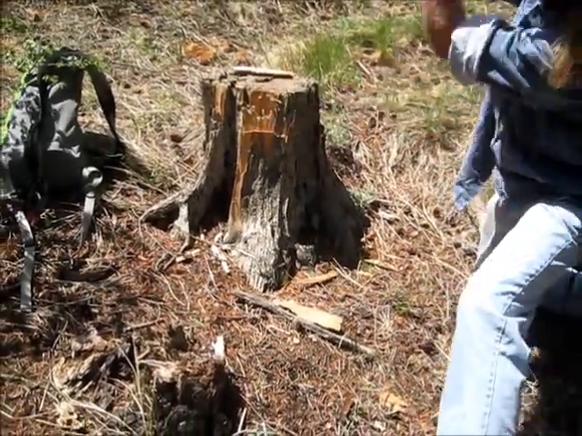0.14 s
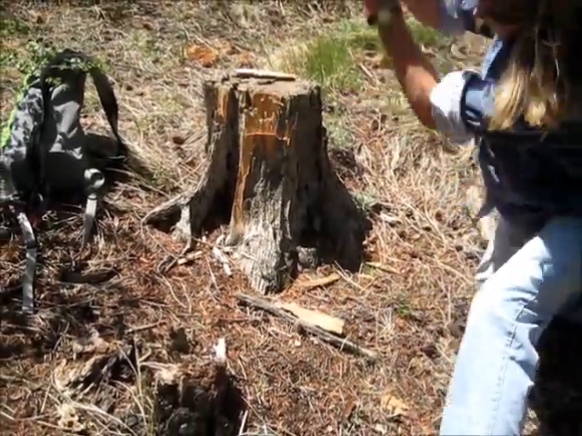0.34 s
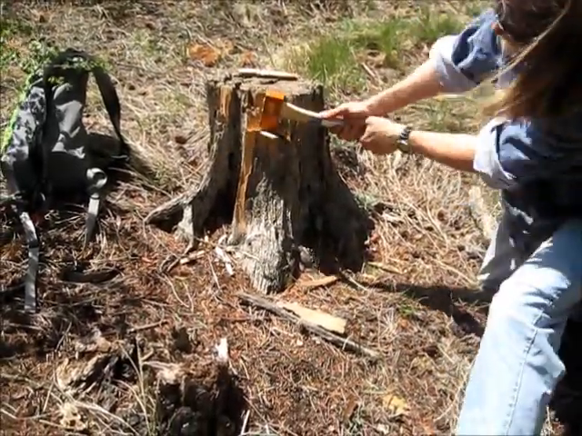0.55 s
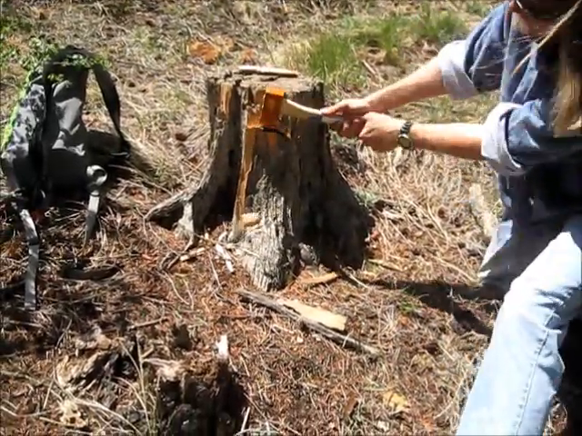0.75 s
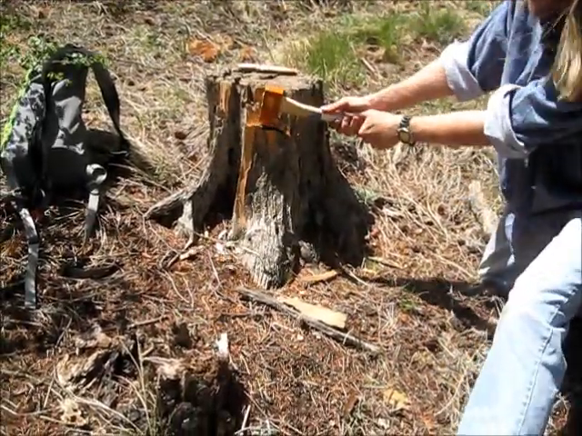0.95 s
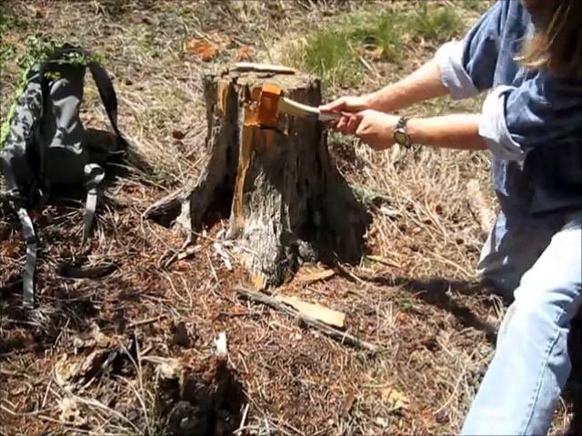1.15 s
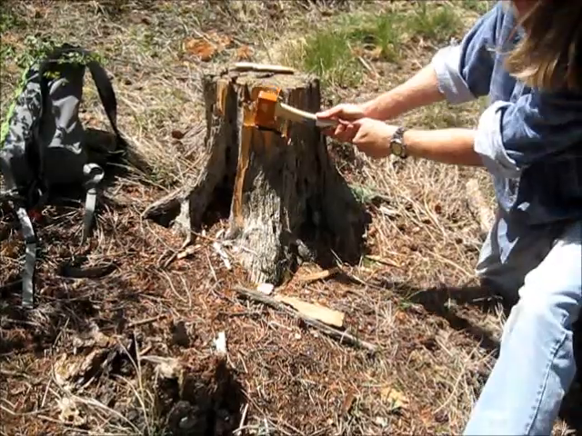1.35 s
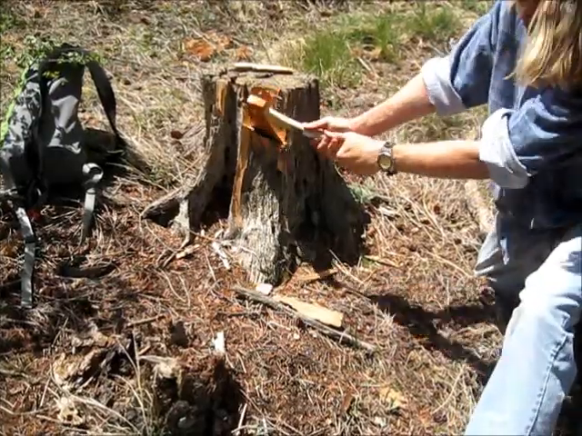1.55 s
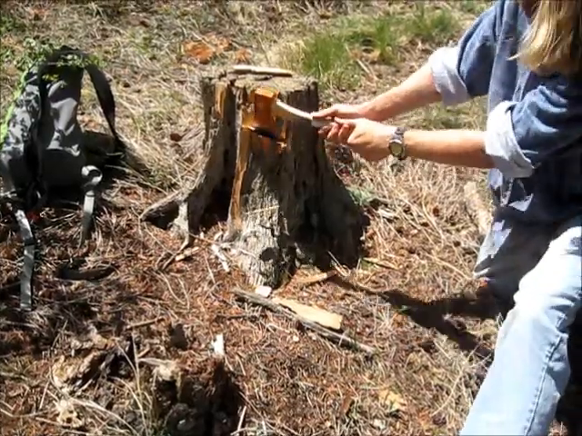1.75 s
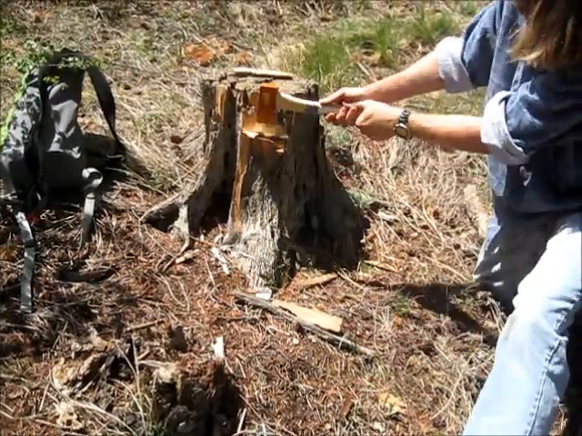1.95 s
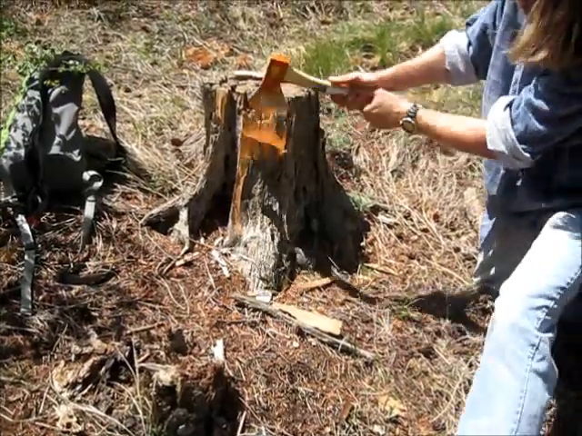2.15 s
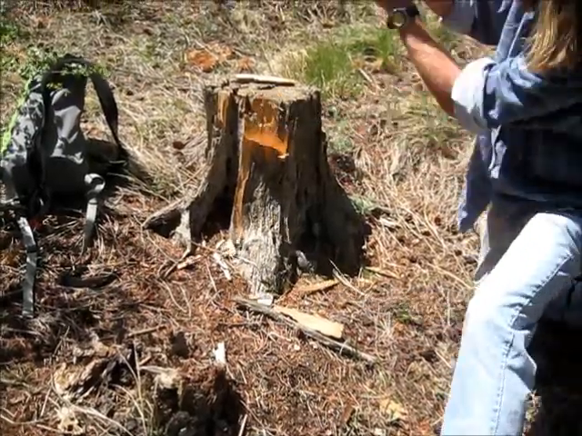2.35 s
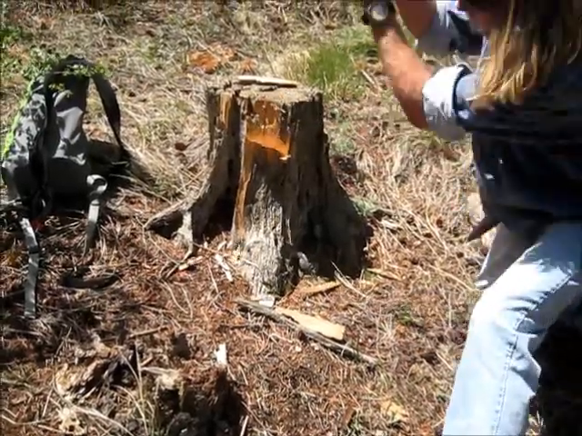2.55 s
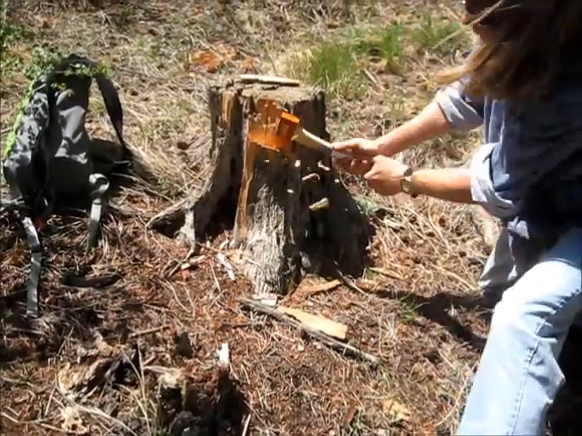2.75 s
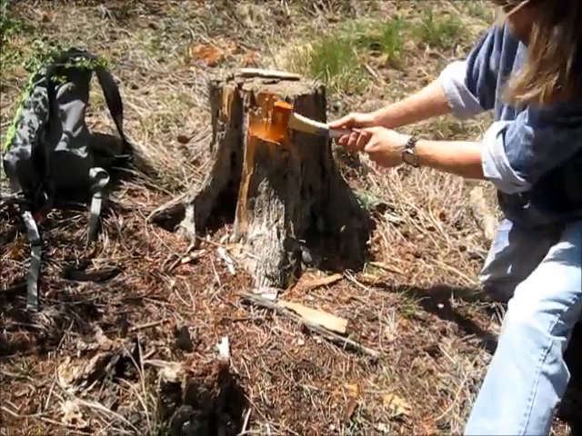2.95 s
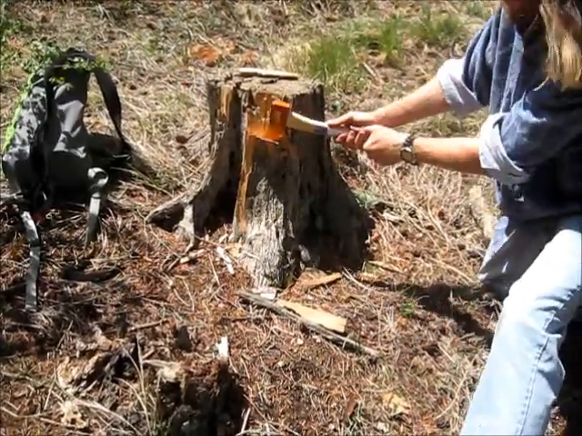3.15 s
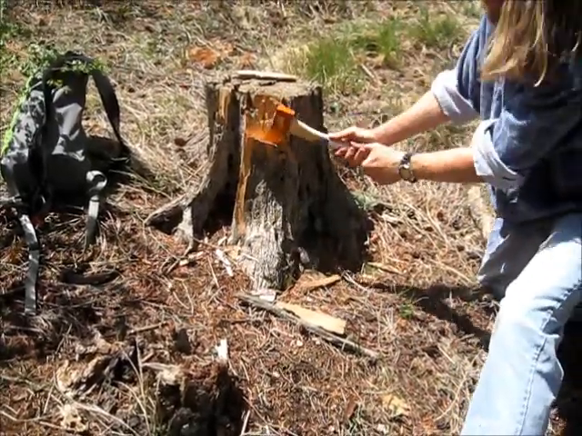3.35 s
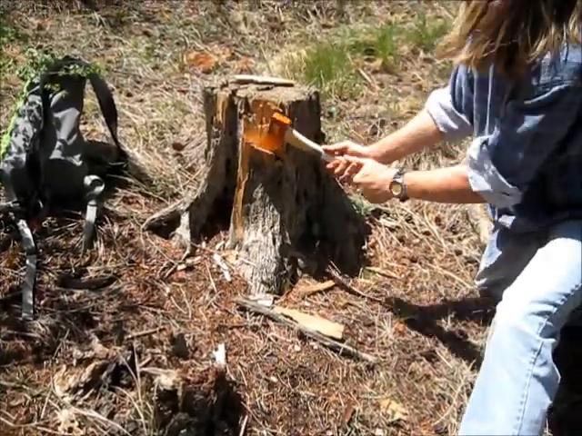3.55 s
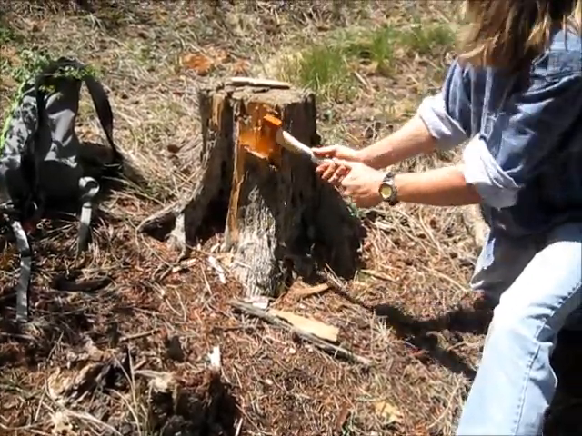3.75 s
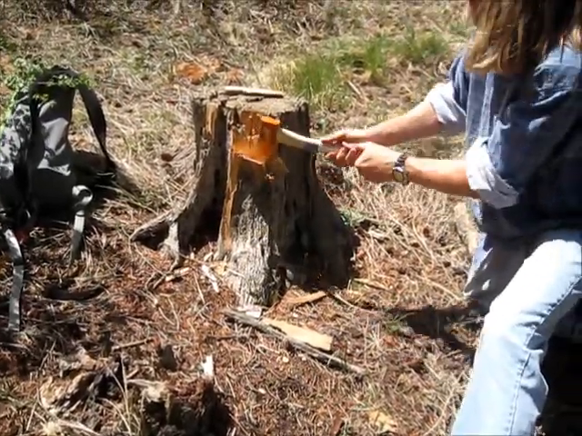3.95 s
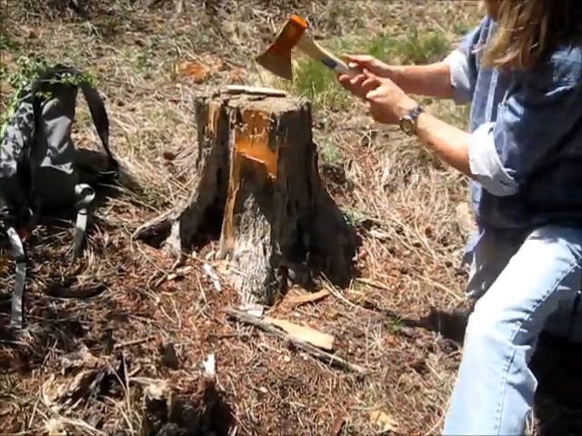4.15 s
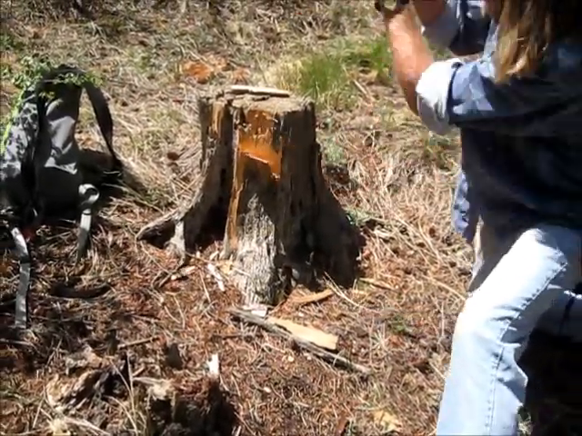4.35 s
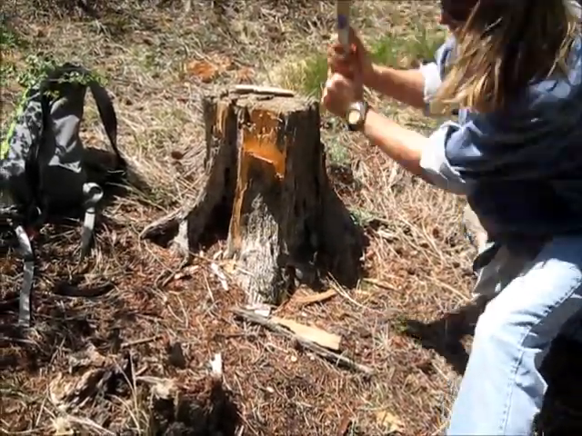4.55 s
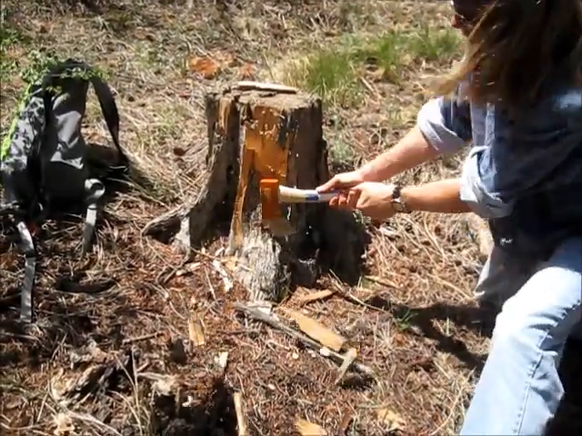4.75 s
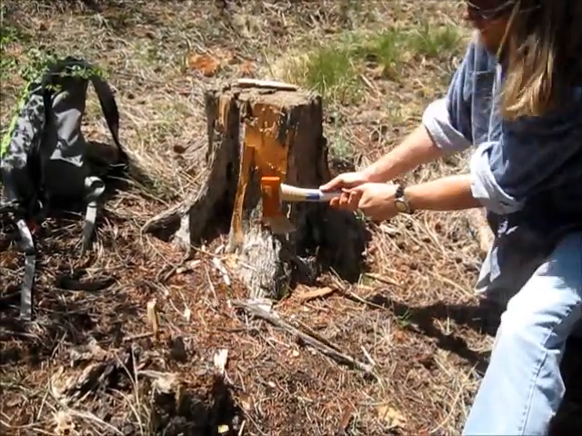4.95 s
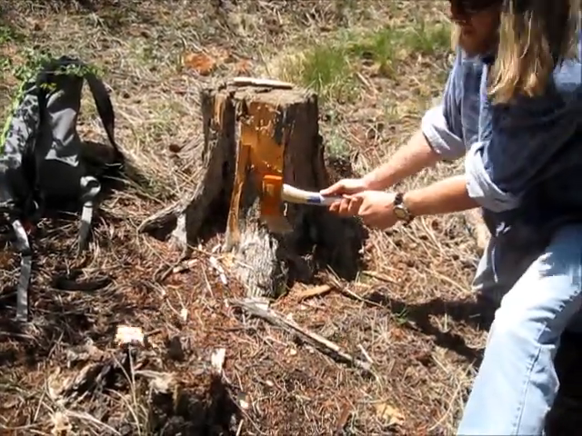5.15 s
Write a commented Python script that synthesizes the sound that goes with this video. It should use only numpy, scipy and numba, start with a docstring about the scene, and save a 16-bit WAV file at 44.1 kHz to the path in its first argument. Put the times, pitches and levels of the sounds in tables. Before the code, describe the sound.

A hatchet chops three times into a stump outdoors, with wood fibres cracking and tearing as the blade is levered between blows.

```python
"""A hatchet bites three times into a resinous stump, two metres from a small camera in a dry clearing.
Each blow crushes fibres and sets the wood ringing. Between blows the blade levers the wood until
fibres tear and snap, and chips land on the litter. Once the blade scrapes free and its steel rings.
Sleeves rustle, a light wind bumps the microphone and distant trees hush.
Loud sounds make the camera turn its level down for a moment, and the loudest still clip."""
import sys
import numpy as np
from scipy import signal
from scipy.fft import rfft, irfft, next_fast_len
from scipy.io import wavfile
from numba import njit

SR = 44100
rng = np.random.default_rng(int(sys.argv[2]) if len(sys.argv) > 2 else 0)


def digitize_waveform(pressure):
    """Quantize a signal to 16-bit integers and store it at the path in sys.argv[1].

    Rows of a 2-D input are taken as channels; values are limited to [-1, 1].
    """
    field = np.atleast_2d(pressure).T
    bounded = np.clip(field, -1, 1)
    quanta = np.round(bounded * 32767).astype(np.int16)
    wavfile.write(sys.argv[1], SR, quanta)


N = 233611
t = np.arange(N) / SR

# Hatchet blows. Each row: start in seconds, peak in dB, delay of the second bite in ms, crushing time
# in ms, grit and tail in dB relative to the bite, tail fade time in seconds, top of the bite in Hz.
BLOWS = [(0.4538, 9.5, 2, 6.2, -2.5, -14, 0.11, 6040), (2.679, 10, 3.144, 9.5, -7.5, -18, 0.082, 4500),
         (4.6224, 8.5, 5.8, 14.3, -15, -0.5, 0.061, 4300)]
def chops():
    """The edge bites twice and crushes fibres as it sinks in, with a woody tail and a low push of air."""
    out, age = np.zeros(N), t[:6000]
    hold_s = .0014
    for start, db, second_ms, crush_ms, grit_db, tail_db, tail_fade, top_hz in BLOWS:
        bites = sum((since > 0) * (since < hold_s) + (since >= hold_s) * fade(abs(since - hold_s), .0024)
                    for since in (age, age - second_ms / 1000))
        sinking = np.clip((crush_ms / 1000 - age) / 0.0017, 0, 1)
        noise = cut(rng.standard_normal((3, len(age))), 470, "high")
        strike = unit(wood(cut(bites * noise[0], top_hz, "low"), 4.1)[:500])
        grit = undb(grit_db) * sinking * unit(wood(noise[1], 3.4))
        tail = undb(tail_db) * fade(age, tail_fade) * unit(wood(noise[2], -4.0))
        add(out, start, np.pad(strike, (0, len(age) - len(strike))) + grit + tail, db)
        add(out, start, air_push(217), db=-22)
    return out


# The stump's own notes. Each row: pitch in Hz, width in Hz, level in dB.
STUMP_NOTES = [(898, 170, -3.5), (1100, 110, -13.5), (1611, 123, 4.5), (2154, 465, 10.5), (2920, 140, -6.5),
               (3317, 81, 2.5), (3960, 280, -2.5), (5680, 1020, 2.5)]
def wood(x, direct_db):
    """The stump adds broad notes that die quickly to the sound passing through it."""
    ringing = sum((-1) ** k * undb(db) * band(x, hz, w) for k, (hz, w, db) in enumerate(STUMP_NOTES))
    return undb(direct_db) * x + ringing


# Snapping fibres, ticks and small chips landing. Each row: start in seconds, peak in dB, pitch in Hz,
# treble in dB relative to that peak, fade time in seconds.
FIBRE_SNAPS = [(0.2977, -28, 2230, -14, 0.0022), (0.3677, -22.5, 2330, -8, 0.005),
               (0.3742, -12, 3160, 12.5, 0.0031), (0.4184, -16.5, 4470, -3, 0.003),
               (0.436, -25, 4180, 10, 0.004), (0.441, -23, 2190, -7, 0.05),
               (0.501, -19.5, 3980, 11.5, 0.0036), (0.5102, -17.5, 3500, -10, 0.0053),
               (0.6245, -29.5, 3280, 13.5, 0.0045), (0.679, -18.5, 2310, 3.5, 0.0038),
               (0.7439, -19, 3670, 5, 0.0038), (0.761, -19, 4010, 11.5, 0.0023),
               (0.7676, -20.5, 3100, -9, 0.005), (0.8304, -11, 5100, 5.5, 0.0095),
               (0.8516, -22.5, 4560, 4, 0.006), (1.0062, -9, 4800, 3, 0.0052),
               (1.0271, -18, 4790, -3, 0.0058), (1.071, -15, 5400, 2, 0.013), (1.0808, -25, 4760, 0, 0.005),
               (1.093, -21.5, 4900, 4, 0.013), (1.1303, -19.5, 4540, 2, 0.0048),
               (1.2486, 4.5, 3640, 3.5, 0.0028), (1.274, -5, 5000, 1, 0.0065),
               (1.281, -9, 4300, -6, 0.0032), (1.286, -14, 4050, 6, 0.0034), (1.2913, -8, 5000, -5, 0.0043),
               (1.2985, 6.5, 3700, -31, 0.0089), (1.3348, -12, 4320, -10, 0.008),
               (1.3399, -8, 3880, -7, 0.0062), (1.354, 5.5, 4250, -20, 0.0044),
               (1.368, -6, 4330, -9, 0.0095), (1.3723, 6.5, 3560, -1, 0.0075),
               (1.3876, -2.5, 3560, -14, 0.0033), (1.398, 6, 2210, -20, 0.005),
               (1.432, 6.5, 2620, -8, 0.004), (1.4415, -4.5, 3270, 1, 0.0093), (1.4452, 1, 3900, -7, 0.012),
               (1.4503, -10, 3760, 0, 0.0057), (1.4576, -3.5, 4900, -2, 0.0053),
               (1.4707, -19, 3760, 10, 0.0056), (1.486, -15.5, 4400, 12, 0.005),
               (1.5084, -2, 3480, 5.5, 0.0074), (1.5828, -21.5, 2060, -22, 0.0061),
               (1.608, -17.5, 5140, -21, 0.0043), (1.622, -14, 3200, -10, 0.0091),
               (1.6443, -14.5, 3370, -3, 0.0053), (1.7105, 0, 3200, 4, 0.00093),
               (1.742, -22, 4630, 0, 0.006), (1.8246, -13, 2300, -2, 0.012), (1.836, -23, 2750, -12, 0.022),
               (1.8859, -15.5, 2980, -14, 0.0079), (1.908, -13.5, 3000, -23, 0.012),
               (2.0033, -37, 3030, 14, 0.003), (2.014, -37, 3870, 22, 0.0034), (2.083, -24, 2570, 2, 0.004),
               (2.2957, -17, 4960, -1, 0.011), (2.303, -21, 4240, -6, 0.02), (2.3255, -24, 4350, -5, 0.01),
               (2.3459, -27, 3690, -1, 0.012), (2.3751, -28.5, 4700, 15, 0.0095),
               (2.647, -22.5, 4000, 9, 0.003), (2.659, -13.5, 5100, 6, 0.0031),
               (2.8559, -15, 2220, -2.5, 0.0022), (2.875, -23, 1940, 6, 0.0041),
               (3.023, -28, 1900, -20, 0.0046), (3.082, -27, 2080, -17, 0.0087),
               (3.1657, -15, 4330, 7.5, 0.0076), (3.1868, -25, 5310, 6, 0.043),
               (3.244, -26, 3470, 10, 0.0033), (3.4125, -25.5, 3950, 7.5, 0.0065),
               (3.4608, -26, 4100, -8, 0.017), (3.4712, -13.5, 3800, -4, 0.0048),
               (3.4996, -15, 5700, 10, 0.0093), (3.5162, -1, 4500, -3, 0.0082),
               (3.5259, 2.5, 4630, -10, 0.003), (3.5293, -3, 3810, -2, 0.0052),
               (3.5485, 2, 3640, -9, 0.0053), (3.5645, -6, 2940, 2, 0.029), (3.5668, -6, 4980, 1, 0.0033),
               (3.571, -0.5, 2980, 2, 0.0066), (3.601, -2.5, 3470, -13, 0.0085),
               (3.612, -12, 3670, -8, 0.0044), (3.6235, -0.5, 3230, 0, 0.011),
               (3.6331, 12, 2830, -35, 0.0023), (3.6473, -7, 4000, -4, 0.003),
               (3.6576, -8, 4640, -1, 0.0044), (3.6913, -3, 3160, -21, 0.0063),
               (3.7997, -24.5, 3410, -2, 0.0055), (3.902, -24, 2980, -7, 0.0071),
               (3.9425, -23, 4230, -9, 0.0057), (3.9595, -13, 3450, 4.5, 0.0043),
               (3.967, -13.5, 3620, -13, 0.0042), (4.0351, -21.5, 1490, -23, 0.028),
               (4.166, -33, 3980, -4, 0.006), (4.578, -19.5, 2050, 5.5, 0.007),
               (4.6505, -6, 4860, 5, 0.019), (4.69, -33, 5490, 21, 0.003), (4.698, -24.5, 2710, 5.5, 0.054),
               (4.7431, -14.5, 2920, -3.5, 0.032), (4.8579, -13, 3800, -15, 0.0083),
               (4.8967, -23, 4180, 8, 0.028), (4.9053, -15.5, 3000, 7, 0.018),
               (4.962, -20, 4220, -6, 0.0036), (5.0011, -16, 2960, -16, 0.0085),
               (5.077, -17, 3210, 4, 0.0048), (5.086, -24, 4500, 10.5, 0.095),
               (5.095, -13, 3780, 5, 0.0046), (5.108, -16, 3400, -6, 0.011),
               (5.1656, -24, 4150, -16, 0.009), (5.1948, -21, 5430, 9, 0.0068),
               (5.2865, -27, 4360, 6.5, 0.012)]
def snaps():
    """Each break is a sharp crack with a weak woody ring, a bright tick and a small push of air."""
    out, age = np.zeros(N), t[:1500]
    for start, db, hz, treble_db, fade_s in FIBRE_SNAPS + small_breaks():
        noise = rng.standard_normal((3, len(age)))
        noise[:, 3] = 3.28  # the first fibre lets go at once
        crack = wood(band(noise[0] * fade(age, fade_s), hz, 0.84 * hz), 17.0)
        ring = wood(noise[1] * fade(age, 0.033), -46.0)
        tick = noise[2] * (fade(age, 0.82 * fade_s) + undb(-17.5) * fade(age, 0.031))
        add(out, start, cut(crack, 710, "high", order=3), db)
        add(out, start, cut(ring, 1500, "high"), db - 16.5)
        add(out, start, cut(tick, 7260, "high"), db + treble_db)
        add(out, start, air_push(810), db - 27.5)
    return out


# The blade levers the wood. Each row: start and end in seconds, typical snap peak in dB, hiss in dB.
LEVER_PULLS = [(1.301, 1.351, -14, -31), (1.362, 1.502, -20, -34), (3.449, 3.493, -16.5, -31),
               (3.502, 3.659, -17, -34.5)]
def tearing(ramp_s=0.01):
    """Splitting wood gives a fine, gritty hiss."""
    level = sum(undb(db) * np.clip(np.minimum(t - start, end - t) / ramp_s, 0, 1)
                for start, end, _, db in LEVER_PULLS)
    return level * unit(cut(grains(1600, 1.2, 0.00038), 2400, "high"))


def small_breaks(breaks_per_s=60, ticks_per_s=8):
    """Random extra rows for snaps(): many weak breaks while levering, stray litter ticks throughout."""
    spans = [(start, end, int(breaks_per_s * (end - start)), db, 0) for start, end, db, _ in LEVER_PULLS]
    spans.append((0.0003, N / SR - .05, int(ticks_per_s * N / SR), -38, 5))
    rows = []
    for start, end, count, db, treble_db in spans:
        times = start + (end - start) * (np.arange(count) + rng.random(count)) / count
        size, pitch, colour = rng.standard_normal((3, count))
        hz = 4000 * 2 ** (0.25 * pitch)
        rows += zip(times, db + 3.5 * size, hz, treble_db + 4.3 * colour, np.full(count, 0.0042))
    return rows


# Hollow knocks. Each row: start in seconds, peak in dB, pitch in Hz, fade time in seconds.
WOOD_KNOCKS = [(0.167, -25.5, 620, 0.02), (0.678, -23, 1510, 0.0053), (1.8224, -19, 1820, 0.034),
               (1.885, -22, 1920, 0.03), (1.907, -26.5, 1770, 0.027), (2.855, -23.5, 770, 0.0098),
               (3.133, -27, 490, 0.013), (3.196, -30.5, 910, 0.01), (3.501, -17.5, 2050, 0.025),
               (4.036, -25, 491, 0.064), (5.097, -23, 506, 0.02), (5.147, -33, 445, 0.03)]
def knocks():
    """A thick chip lands or the handle is knocked: one short, hollow note."""
    out, age = np.zeros(N), t[:6000]
    for start, db, hz, fade_s in WOOD_KNOCKS:
        add(out, start, fade(age, fade_s) * np.sin(2 * np.pi * hz * age), db)
    return out


CATCH_S, SLIP_S = 3.952, 3.982  # when the blade catches, and when it slips free
def scrape(rise_db_per_s=167):
    """Steel drags on wood, louder as it loosens, catches, then slips off brighter as contact shrinks."""
    grit = grains(2500, 2.8, 0.00068)
    dull = unit(wood(band(grit, 3460, 2000), -2.3))
    bright = unit(band(grit, 7800, 6400))
    drag = undb(-33 + rise_db_per_s * np.minimum(t - CATCH_S, 0))
    drag *= np.exp(-(np.maximum(t - CATCH_S, 0) / 0.019) ** 2)
    slip = undb(-30) * (t > SLIP_S) * np.exp(-((t - SLIP_S) / .012) ** 4)
    return drag * (0.78 * dull + 0.22 * bright) + slip * (0.3 * dull + 0.7 * bright)


# The steel head's notes. Each row: pitch in Hz, relative level in dB, fade time in seconds.
STEEL_NOTES = [(7465, 5, 0.33), (11800, -14, 0.25), (6000, 0.0, 0.05)]
def blade_ring():
    """The steel head rings as it slips free."""
    out, age = np.zeros(N), t[:20000]
    ring = sum(undb(db) * fade(age, fade_s) * np.sin(2 * np.pi * hz * age)
               for hz, db, fade_s in STEEL_NOTES)
    add(out, SLIP_S, ring, db=-23.5)
    return out


# Crumbs of wood and litter shift. Each row: loudest moment in seconds, level in dB, half length in seconds.
LITTER_SCUFFS = [(0.15, -46.5, 0.12), (0.58, -42, 0.084), (0.764, -45, .06), (0.988, -45.5, 0.11),
                 (1.65, -52.5, 0.072), (1.9, -53, 0.065), (2.131, -49.5, .08), (2.825, -47, .12),
                 (3.15, -50, 0.11), (3.47, -45, 0.057), (4.303, -59.5, 0.14), (4.983, -43, 0.067),
                 (5.13, -43, 0.086)]
def scuffs():
    """Crumbs scuff and settle in dull grains that ring the wood."""
    crumbs = cut(grains(900, 2.83, 0.002), 370, "high")
    return swells(LITTER_SCUFFS, rest_db=-62.5) * unit(wood(cut(crumbs, 3800, "low"), 6.0))


# Arm movements. Each row: loudest moment in seconds, level in dB, treble in dB, half length in seconds.
SLEEVE_SWISHES = [(0.183, -46, -36.5, 0.13), (0.4, -48.5, -40.5, 0.05), (0.8, -46, -39.5, 0.085),
                  (1.06, -57, -49.5, 0.1), (1.226, -56, -50, 0.11), (1.625, -49.5, -48, 0.12),
                  (1.857, -50, -45, 0.095), (2.03, -59, -49.5, 0.045), (2.323, -54, -50, 0.052),
                  (2.624, -47, -40.5, 0.068), (2.878, -51, -44.5, 0.096), (3.17, -51, -40, 0.062),
                  (3.38, -53.5, -46, 0.12), (3.73, -47, -54, 0.098), (4.59, -51, -45, .04),
                  (4.795, -46.5, -43, 0.063), (4.924, -44, -39, 0.065), (5.104, -43.5, -37.5, 0.098)]
def sleeves():
    """Rubbing cloth swishes in fine, dry grains."""
    fine = grains(1600, 2.33, 0.00082)
    swish = unit(cut(cut(fine, 2000, "high"), 7430, "low"))
    hiss = unit(cut(fine, 7300, "high", order=4))
    swish_level = swells([(s, db, half) for s, db, _, half in SLEEVE_SWISHES], rest_db=-57.5)
    hiss_level = swells([(s, db, half) for s, _, db, half in SLEEVE_SWISHES], rest_db=-53)
    return swish_level * swish + hiss_level * hiss


# Gusts. Each row: strongest moment in seconds, level in dB, half length in seconds.
WIND_GUSTS = [(0.15, -46, 0.093), (0.355, -44.5, 0.13), (0.932, -56, 0.059), (1.237, -60, 0.18),
              (1.99, -58, 0.2), (2.595, -42.5, 0.098), (2.87, -40.5, 0.058), (4.403, -57.5, .25)]
# Single swings of air pressure. Each row: crest time in seconds, peak in dB, pitch in Hz.
WIND_BUMPS = [(0.239, -25.5, 157), (0.365, -28.5, 113), (0.914, -36, 136), (.955, -34, 114),
              (2.385, -41.5, 78.6), (2.595, -32, 147), (2.646, -27.5, 117), (2.828, -16, 212),
              (2.871, -23, 154), (2.942, -32, 111), (3.31, -38.5, 100), (4.24, -37, 110),
              (4.807, -28.5, 144), (4.823, -30.5, 116)]
def wind():
    """Air swirling at the microphone opening makes an uneven rumble and soft bumps."""
    rumble = unit(cut(band(grains(100, 3.9, 0.014), 75, 106), 710, "low"))
    out = swells(WIND_GUSTS, rest_db=-64.5) * rumble
    offset = np.arange(-1500, 1500) / SR
    for crest, db, hz in WIND_BUMPS:
        phase = np.pi * hz * offset
        add(out, crest + offset[0], (1 - 2 * phase ** 2) * np.exp(-phase ** 2), db)
    return out


# The tone of the trees' hush. Each row: frequency in Hz, relative level in dB.
HUSH_TONE = [(18, -51), (30, -6), (86, -15), (496, -13.5), (582, -7.5), (715, -12), (1350, -13.5),
             (2240, -11), (2620, -19), (7000, -29), (9100, -65), (15400, -120)]
def distant_trees(level_db=-51.5):
    """Far-off trees blend into a smooth, steady hush."""
    hz, db = np.transpose(HUSH_TONE)
    size = next_fast_len(N)
    freqs = np.maximum(np.arange(size // 2 + 1) * SR / size, 1)
    tone = undb(np.interp(np.log(freqs), np.log(hz), db))
    return undb(level_db) * unit(irfft(rfft(rng.standard_normal(size)) * tone, size)[:N])


def air_push(hz):
    """One short, one-sided pulse of air pressure."""
    return -np.exp(-(np.pi * hz * (t[:600] - 1.445 / hz)) ** 2)


def grains(per_s, spread_db, tail_s):
    """Noise made of tiny clicks of very uneven size, each with a short tail."""
    size = (rng.random(N) < per_s / SR) * undb(spread_db * rng.exponential(size=N))
    power = signal.lfilter([1], [1, -np.exp(-1 / (tail_s * SR))], size ** 2)
    return unit(rng.standard_normal(N) * np.sqrt(power + 1e-12))


def swells(rows, rest_db):
    """Smooth rises and falls above a resting level."""
    return undb(rest_db) + sum(undb(db) * np.exp(-((t - s) / half) ** 2) for s, db, half in rows)


def fade(age, fade_s):
    """Dies away by 60 dB in the fade time."""
    return np.exp(-np.log(1000) * age / fade_s)


def band(x, hz, width):
    """Keeps the sound around one pitch."""
    return signal.lfilter(*signal.iirpeak(min(hz, .45 * SR), hz / width, fs=SR), x)


def cut(x, hz, keep, order=2):
    """Keeps the "low" or "high" side of hz."""
    return signal.sosfilt(signal.butter(order, hz, keep, fs=SR, output="sos"), x)


def add(out, start, x, db):
    """Mixes in a burst with the given peak."""
    i = int(start * SR)
    out[i:i + len(x)] += (undb(db) * x / np.abs(x).max())[:N - i]


def undb(db):
    """Turns dB into a multiplier."""
    return 10 ** (np.asarray(db) / 20)


def unit(x):
    """Scales to an average power of 1."""
    return x / np.sqrt(np.mean(x ** 2))


def scene():
    """The hatchet work and its background, in one channel."""
    wood_work = chops() + snaps() + tearing() + knocks() + scrape() + blade_ring()
    return (wood_work + wind() + scuffs() + sleeves() + distant_trees())[None]


@njit
def follow(x, rise_s, fall_s):
    """Tracks how loud the sound is."""
    level, levels = 0., np.empty(len(x))
    for i in range(len(x)):
        levels[i] = level
        level += (abs(x[i]) - level) / (SR * (rise_s if abs(x[i]) > level else fall_s))
    return levels


def record(dry):
    """The camera loses the highest treble, turns down after loud sounds and clips the biggest peaks."""
    x = dry[0] - band(dry[0], 8030, 1400)  # the microphone's cavity cancels a narrow band
    x = x - 0.51 * band(x, 7860, 630)
    x = signal.sosfilt(signal.ellip(8, .2, 40, 15800, fs=SR, output="sos"), x)
    loudness = follow(np.clip(x, -1, 1), rise_s=0.011, fall_s=0.081)
    turn_down = np.maximum(loudness / undb(-27.0), 1) ** 0.18
    x = np.clip(x / turn_down, -.97, .97)
    return signal.sosfilt(signal.ellip(8, .2, 60, 16600, fs=SR, output="sos"), x)[None]


dry = scene()
out = record(dry)
digitize_waveform(out)
```